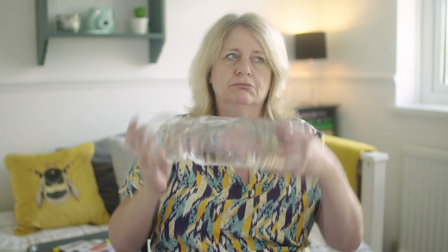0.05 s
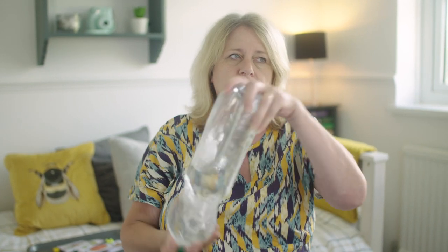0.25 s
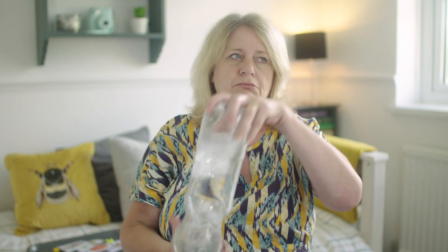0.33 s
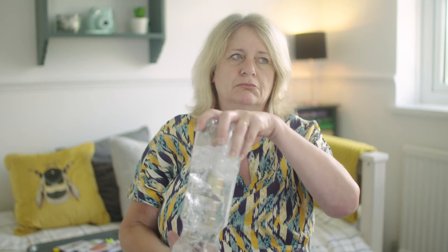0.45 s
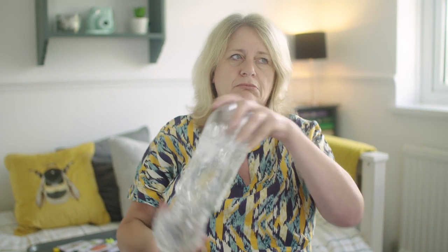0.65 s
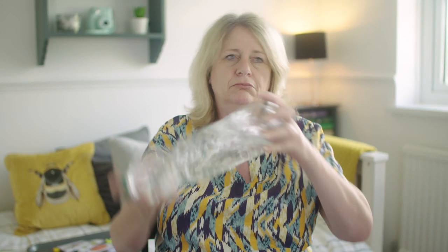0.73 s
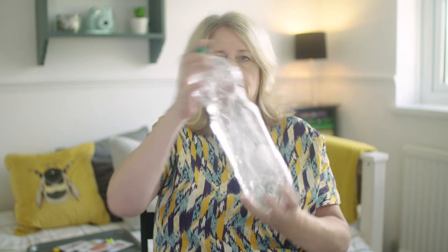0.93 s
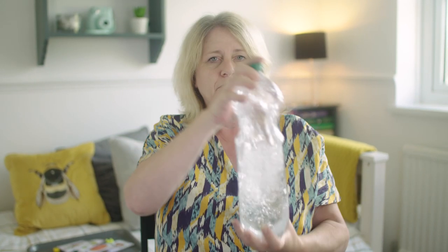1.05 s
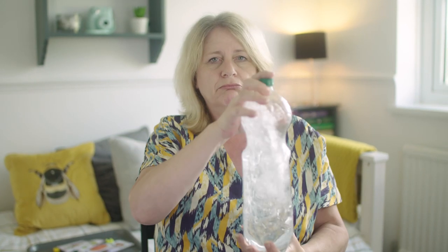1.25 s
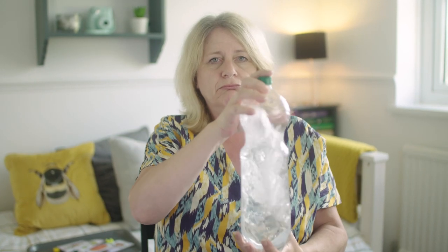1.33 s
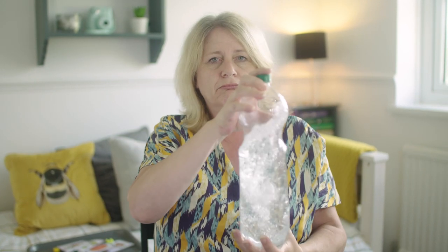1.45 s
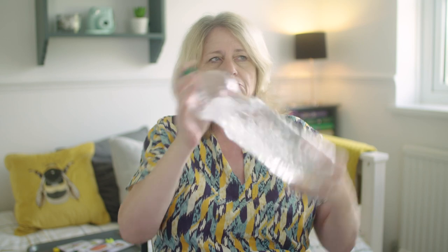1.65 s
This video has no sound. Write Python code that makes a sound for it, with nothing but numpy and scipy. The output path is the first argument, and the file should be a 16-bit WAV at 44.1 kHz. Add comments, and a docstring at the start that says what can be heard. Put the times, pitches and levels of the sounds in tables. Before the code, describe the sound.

Water sloshes in a large plastic bottle shaken by hand in a small room. The loudest splashes and gulps come at about 0.2 to 0.4 seconds, with sharp plastic snaps. The water eases to trickles until 0.8 seconds. A second run of fizzy sloshing, with crinkles and a few soft thuds, lasts from 0.9 to 1.5 seconds, then settles. Sleeves swish faintly throughout.

```python
"""In a small furnished room, a large thin plastic bottle of salted water is shaken by hand.
The water is thrown from end to end: swarms of ringing bubbles gurgle, splash and fizz, large air
pockets gulp, and drops patter and trickle back while the bottle rings along. The wall snaps and
crinkles under the grip, and the moving arms add a soft rumble, a swish of sleeves and a few thuds."""
import sys
import numpy as np
from scipy import signal
from scipy.fft import rfft, irfft
from scipy.io import wavfile

SR = 44100
rng = np.random.default_rng(int(sys.argv[2]) if len(sys.argv) > 2 else 0)


def transcribe(u):
    """Save the signal u as a 16-bit wav file named by the first command-line argument.

    u: samples, shape (n,) or (channels, n), limited to [-1, 1]; the rate is SR.
    q: integer samples, one column per channel.
    """
    v = np.clip(np.atleast_2d(u).T, -1, 1)
    q = np.round(v * 32767).astype(np.int16)
    wavfile.write(sys.argv[1], SR, q)


N = 74970

# surges of water against the wall, each with three relative levels
# (time [s], length [s], gurgle [dB], splash [dB], fizz [dB])
SURGES = [(0.209, 0.05, -48.5, -46.5, -44.5), (0.239, 0.057, -44.5, -46, -46.5),
          (0.259, 0.0068, -39, -54, -43.5), (.305, 0.04, -48, -56, -61), (0.348, 0.0046, -38.5, -50, -68),
          (0.367, 0.075, -52.5, -54.5, -58.5), (0.453, 0.041, -54, -53.5, -62),
          (0.536, 0.038, -63, -56.5, -63), (0.569, 0.049, -64, -61, -74), (0.819, 0.0093, -59, -66, -55.5),
          (0.916, 0.072, -53.5, -53, -53.5), (1.011, 0.023, -41, -53, -50.5),
          (1.07, 0.058, -52, -53.5, -64), (1.104, 0.021, -48, -52.5, -53), (1.133, 0.063, -49, -57, -56),
          (1.183, 0.046, -45.5, -45.5, -46), (1.237, 0.012, -43, -41, -40), (1.269, 0.034, -60, -62, -73),
          (1.306, 0.0058, -54.5, -44.5, -51), (1.334, 0.011, -54.5, -58.5, -50),
          (1.368, 0.05, -56.5, -60, -54), (1.406, 0.0072, -47.5, -43.5, -41),
          (1.419, 0.013, -51, -45.5, -46.5), (1.455, .012, -56.5, -52.5, -54)]
GURGLE, SPLASH, FIZZ = 2, 3, 4  # columns of SURGES


def amp(db):
    """Decibels to gain."""
    return 10 ** (np.asarray(db) / 20)


def unit_rms(x):
    """Scales a sound to rms 1."""
    return x / np.sqrt(np.mean(x ** 2) + 1e-20)


def at_hz(points, hz):
    """Reads a table on a log-frequency axis."""
    f, value = np.transpose(points)
    return np.interp(np.log(hz + 1), np.log(f + 1), value)


def add(mix, s, sound):
    """Mixes a sound in at time s."""
    part = mix[max(round(s * SR), 0):][:len(sound)]
    part += sound[:len(part)]


def coloured(x, spectrum):
    """EQs a sound with a curve, at rms 1."""
    gain = amp(at_hz(spectrum, np.fft.rfftfreq(len(x), 1 / SR)))
    return unit_rms(irfft(rfft(x) * gain, len(x)))


def fader(points):
    """Gain over time from a curve in dB."""
    return amp(np.interp(np.arange(N) / SR, *np.transpose(points)))


def ring(t, hz, t60, glide=0):
    """A dying tone whose pitch climbs by the share glide each second."""
    return np.sin(2 * np.pi * hz * t * (1 + glide * t / 2)) * amp(-60 * t / t60)


def noise_burst(t, hz, t60, octaves):
    """Dying noise in a band around a pitch."""
    f = np.fft.rfftfreq(len(t), 1 / SR)
    band = np.exp(-(np.log2((f + 1) / hz) / octaves) ** 2)
    noise = irfft(rfft(rng.standard_normal(len(t))) * band, len(t))
    return unit_rms(noise) * amp(-60 * t / t60)


def room_tone():
    """A faint, steady bed of air."""
    # colour of the room's air (frequency [Hz], gain [dB])
    air_eq = [(25, 4), (100, -16), (400, -7.5), (1500, -14.5), (6000, -22.5), (16000, -21)]
    return amp(-71.5) * coloured(rng.standard_normal(N), air_eq)


def handling():
    """The swung arms rumble, the sleeves swish, and the water's weight thuds into the hands."""
    # rumble of the arms (time [s], level [dB])
    rumble_levels = [(0, -67.5), (.15, -56.5), (.26, -51.5), (.4, -60.5), (.5, -67), (.69, -66), (.83, -55),
                     (.9, -61), (.96, -51.5), (1.02, -71), (1.15, -56.5), (1.24, -51.5), (1.31, -67),
                     (1.46, -67), (1.57, -82), (1.62, -67.5), (1.69, -54)]
    # its dark colour (frequency [Hz], gain [dB])
    rumble_eq = [(20, -11.5), (62, -6.5), (110, -6.5), (170, -8), (320, -11.5), (700, -20), (2000, -60)]
    # swish of the sleeves (time [s], level [dB])
    swish_levels = [(0, -68.5), (.055, -55.5), (.12, -59), (.18, -53.5), (.3, -56), (.52, -67.5),
                    (.61, -72), (.68, -59), (.78, -64.5), (.82, -60), (.87, -62.5), (.95, -56.5),
                    (1.3, -66.5), (1.46, -66), (1.52, -75), (1.6, -68), (1.7, -61)]
    # colour of the cloth (frequency [Hz], gain [dB])
    sleeve_eq = [(200, -22), (900, -7), (1400, -2.5), (2000, 3), (3000, -1.5), (5500, -0.5), (9000, -9),
                 (16000, -16.5)]
    # thuds of the water's weight (time [s], level [dB], pitch [Hz])
    thuds = [(0.839, -43, 63), (0.928, -41.5, 74), (0.948, -39, 57.6), (1.235, -42.5, 147.4)]
    t, rise_s = np.arange(8000) / SR, 0.0052
    out = coloured(rng.standard_normal(N), rumble_eq) * fader(rumble_levels)
    out += coloured(rng.standard_normal(N), sleeve_eq) * fader(swish_levels)
    for s, db, hz in thuds:
        add(out, s, amp(db) * np.minimum(t / rise_s, 1) * ring(t, hz, t60=0.14))
    return out


def snaps():
    """A patch of the thin wall buckles or a bubble bursts: a quickly damped tone inside a broad crack."""
    # wall snaps and bubble bursts (time [s], level [dB], pitch [Hz], t60 [s])
    hits = [(0.189, -35, 3870, 0.0096), (0.205, -34.5, 5500, 0.016), (0.215, -33.5, 3240, 0.014),
            (0.2618, -21, 2140, 0.012), (0.278, -31, 3330, 0.016), (0.295, -28, 4760, 0.0078),
            (.349, -19.5, 2517, 0.0089), (0.459, -35.5, 3560, 0.018), (0.485, -37.5, 4140, 0.01),
            (.535, -38.5, 2800, 0.01), (0.5519, -36.5, 1380, 0.013), (.629, -34.5, 5300, 0.0079),
            (0.7001, -31, 5260, 0.009), (0.7, -36, 2760, 0.009), (.747, -44.5, 2670, 0.012),
            (0.909, -31.5, 3590, 0.0098), (.935, -35, 3470, 0.013), (.943, -29.5, 3150, 0.0089),
            (.9617, -37, 5460, .008), (0.976, -38, 5330, 0.0088), (1.0128, -37, 5000, 0.0094),
            (1.0177, -37.5, 2440, 0.011), (1.176, -27, 2050, 0.017), (1.1867, -34.5, 6440, 0.0073),
            (1.251, -27.5, 2336, 0.019), (1.31, -33.5, 1890, 0.01), (1.3694, -40.5, 5900, 0.0092),
            (1.403, -36.5, 3680, 0.0097), (1.4105, -32, 3300, 0.0067), (1.6097, -50, 2620, 0.017)]
    t, out = np.arange(2048) / SR, np.zeros(N)
    rise_s = 0.00082
    for s, db, hz, t60 in hits:
        crack = amp(-5) * noise_burst(t, hz, t60, octaves=0.68)
        add(out, s, amp(db) * np.minimum(t / rise_s, 1) * (ring(t, hz, t60) + crack))
    return out


def bubbles(low_hz, high_hz, per_s, cycles, spread_db, wash_db, climb, voices=36):
    """A swarm of bubbles, each ringing some cycles as it climbs in pitch, over a wash of churned water."""
    # colour of the churned water (frequency [Hz], gain [dB])
    water_eq = [(120, 4.5), (220, -11), (350, -4), (480, -5), (700, -6.5), (1100, -6.5), (1500, -5),
                (2300, -6), (3500, -5.5), (6000, -7), (8000, -13.5), (10500, -23.5), (16000, -42)]
    t, swarm = np.arange(4000) / SR, np.zeros(N)
    for hz in np.linspace(low_hz, high_hz, voices) * rng.uniform(0.908, 1.031, voices):
        strength = amp(spread_db * np.minimum(rng.exponential(1, N), 3)) * rng.choice([-1, 1], N)
        births = strength * (rng.random(N) < per_s / voices / SR)
        t60 = cycles / hz * rng.uniform(0.58, 1.95)
        swarm += signal.oaconvolve(births, unit_rms(ring(t, hz, t60, climb / t60)))[:N]
    wash = amp(wash_db) * rng.standard_normal(N)
    band = signal.butter(3, [low_hz, high_hz], "bandpass", fs=SR, output="sos")
    return coloured(signal.sosfilt(band, unit_rms(swarm) + wash), water_eq)


def surge_envelope(surges, column=2):
    """Each rush of water rises quickly to the level in the given column, holds and dies away."""
    rise_s, fall_db_per_s = 0.0043, 664
    t, power = np.arange(N) / SR, np.zeros(N)
    for row in surges:
        age = t - row[0]
        attack = np.clip(age / rise_s, 0, 1)
        release_db = fall_db_per_s * np.maximum(age - row[1], 0)
        power += (attack * amp(row[column] - release_db)) ** 2
    return np.sqrt(power)


def clumps():
    """The spray lands in clumps: quick random swings in its level."""
    clump_s, swing_db = 0.0044, 2
    window = np.hanning(round(2 * clump_s * SR))
    jitter = unit_rms(np.convolve(rng.standard_normal(N), window, "same"))
    return unit_rms(amp(swing_db * np.clip(jitter, -2, 2)))


def water():
    """Each surge stirs up big bubbles, small bubbles and a fine spray; at times water trickles back."""
    # water trickling down the wall (time [s], length [s], level [dB])
    trickles = [(.43, 0.036, -52.5), (.553, 0.034, -53.5), (.716, 0.022, -57)]
    gurgle = bubbles(169, 1407, per_s=1300, cycles=12, spread_db=6, wash_db=-6.5, climb=0.061)
    splash = bubbles(1348, 4054, per_s=1800, cycles=20, spread_db=4.6, wash_db=-14, climb=0.07)
    fizz = bubbles(3900, 14260, per_s=2600, cycles=16, spread_db=4.5, wash_db=-1, climb=0.029)
    trickle = bubbles(720, 1654, per_s=2300, cycles=12, spread_db=3.5, wash_db=-15, climb=0.087)
    gurgle *= amp(-1.72) * surge_envelope(SURGES, GURGLE)
    splash *= surge_envelope(SURGES, SPLASH)
    fizz *= amp(-1.4) * surge_envelope(SURGES, FIZZ)
    trickle *= surge_envelope(trickles)
    return gurgle + (splash + fizz) * clumps() + trickle


def bottle(x):
    """The bottle rings along with the water at its own pitches."""
    # resonances of the bottle and the air in it (pitch [Hz])
    modes = [320, 418, 474, 694, 761, 964, 1155]
    width_hz = 32
    ringing = sum(signal.lfilter(*signal.iirpeak(hz, hz / width_hz, fs=SR), x) for hz in modes)
    return x + amp(-6) * ringing


def droplets():
    """Single drops keep falling back and pinging for a moment after each splash."""
    settle_s = 0.036
    pole = np.exp(-1 / (settle_s * SR))
    falling = signal.lfilter([1 - pole], [1, -pole], surge_envelope(SURGES, SPLASH))
    pings = bubbles(1198, 9190, per_s=260, cycles=51, spread_db=3, wash_db=-25, climb=0.076)
    return amp(-11.5) * falling * pings


def gulps():
    """Large pockets of air close and ring briefly, each followed by its own short, noisy echo around its pitch."""
    # closing air pockets (time [s], level [dB], pitch [Hz], t60 of the tone [s])
    pockets = [(.209, -38.5, 174, 0.035), (0.2611, -33, 425, .025), (.2625, -29.5, 711, 0.021),
               (.2635, -26.5, 1030, 0.015), (0.272, -39, 300, 0.027), (.3485, -25.5, 910, 0.011),
               (.3525, -39, 571, 0.02), (.357, -39.5, 1104, 0.035), (.380, -37.5, 278, 0.037),
               (.399, -40, 510, 0.04), (0.439, -38, 496, 0.037), (.656, -40, 772, 0.041),
               (0.6563, -44, 444, 0.068), (.728, -48, 811, 0.088), (1.009, -34.5, 480, 0.027),
               (1.024, -40, 740, 0.037), (1.024, -41.5, 303, 0.096), (1.208, -39, 405, 0.019),
               (1.254, -33.5, 613, 0.02), (1.333, -36.5, 1270, 0.013), (1.408, -47, 433, 0.029)]
    t, out = np.arange(6000) / SR, np.zeros(N)
    attack = 1 - np.exp(-t / 0.00022)
    for s, db, hz, t60 in pockets:
        blur = amp(-9.5) * noise_burst(t, hz, 1.94 * t60, octaves=1)
        add(out, s, amp(db) * attack * (ring(t, hz, t60, glide=0.8) + blur))
    return out


def crinkles():
    """Tiny creases in the plastic flip over with a bright, toneless click."""
    # flipping creases (time [s], level [dB])
    ticks = [(0.2121, -34), (0.2965, -41), (.486, -47), (.534, -34.5), (.848, -45.5), (0.8845, -44.5),
             (0.9106, -40), (0.926, -37), (.989, -45.5), (1.2048, -37), (1.2304, -41), (1.337, -50),
             (1.5566, -53.5)]
    # colour of a click (frequency [Hz], gain [dB])
    crease_eq = [(500, -23), (1500, -12), (2800, -3.5), (8000, -1), (11000, -7), (16000, -16.5)]
    t, out = np.arange(1024) / SR, np.zeros(N)
    t60 = 0.0059
    for s, db in ticks:
        add(out, s, coloured(rng.standard_normal(len(t)), crease_eq) * amp(db - 60 * t / t60))
    return out


def mist():
    """The smallest drops merge into an airy hiss."""
    # fine mist from the hardest throw (time [s], length [s], level [dB])
    puffs = [(.25, .045, -60)]
    highpass = signal.butter(2, 10000, "highpass", fs=SR, output="sos")
    return unit_rms(signal.sosfilt(highpass, rng.standard_normal(N))) * surge_envelope(puffs)


def room(x, early_db, early_t60, tail_db):
    """Quick echoes inside and around the bottle, then the short tail of the room."""
    # decay of the furnished room (frequency [Hz], t60 [s])
    decay_times = [(200, 0.074), (700, 0.35), (2000, 0.21), (6000, 0.086), (14000, 0.19)]
    t = np.arange(SR // 2) / SR
    taps = rng.standard_normal(len(t)) * (rng.random(len(t)) < .15) * (t > .002)
    early = taps * amp(-60 * t / early_t60)
    late_noise = rng.standard_normal(len(t)) * (t > .008)
    hz, age, bands = signal.stft(late_noise, SR, nperseg=256)
    decay = amp(-60 * age / at_hz(decay_times, hz)[:, None])
    tail = signal.istft(bands * decay, SR, nperseg=256)[1][:len(t)]
    echo = amp(early_db) * early / np.linalg.norm(early) + amp(tail_db) * tail / np.linalg.norm(tail)
    return x + signal.fftconvolve(x, echo)[:N]


def scene():
    """Water, bottle wall and handling in the quiet room, in mono."""
    air = room_tone()
    slosh = room(bottle(water()) + droplets(), early_db=-14.5, early_t60=0.055, tail_db=-13)
    gulping = room(bottle(gulps()), early_db=-10, early_t60=0.047, tail_db=-11.5)
    wall = room(snaps() + crinkles(), early_db=-10, early_t60=0.026, tail_db=-13)
    return (slosh + gulping + wall + handling() + air + mist())[None]


def record(dry):
    """A steep low-pass trims the very top of the treble."""
    lowpass = signal.firwin(511, cutoff=16100, window=("kaiser", 9), fs=SR)
    return signal.oaconvolve(dry, lowpass[None], "same")


dry = scene()
out = record(dry)
transcribe(out)
```